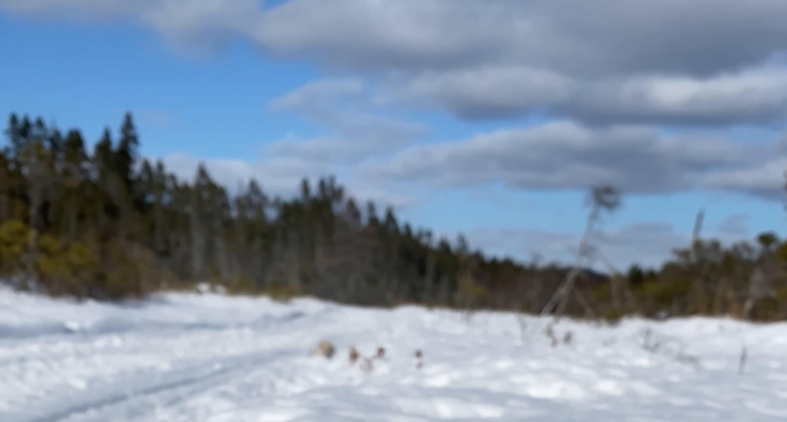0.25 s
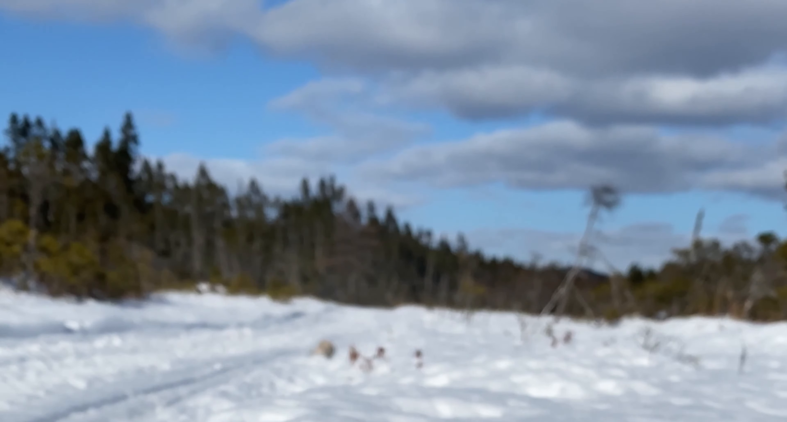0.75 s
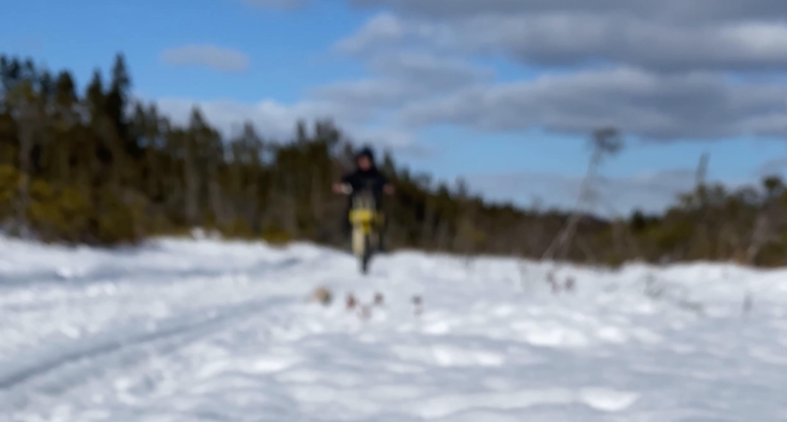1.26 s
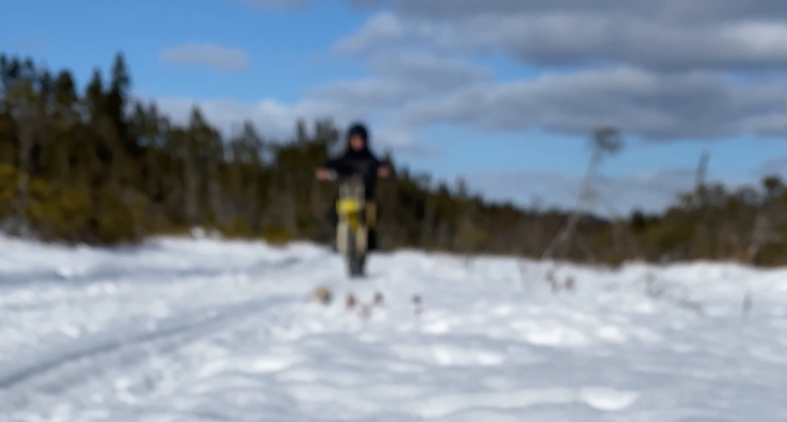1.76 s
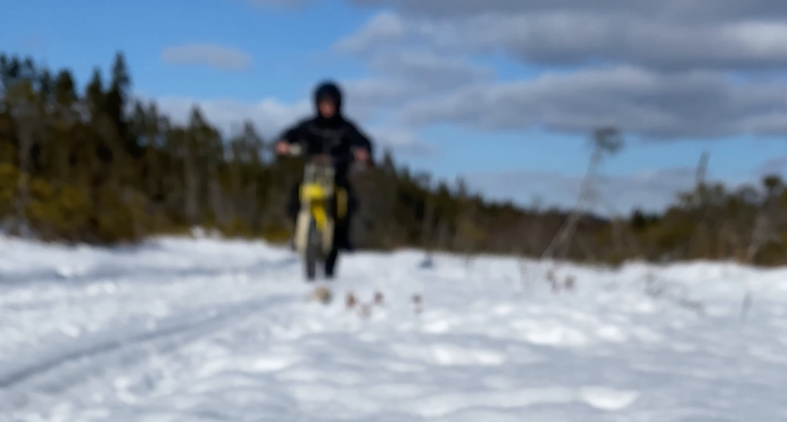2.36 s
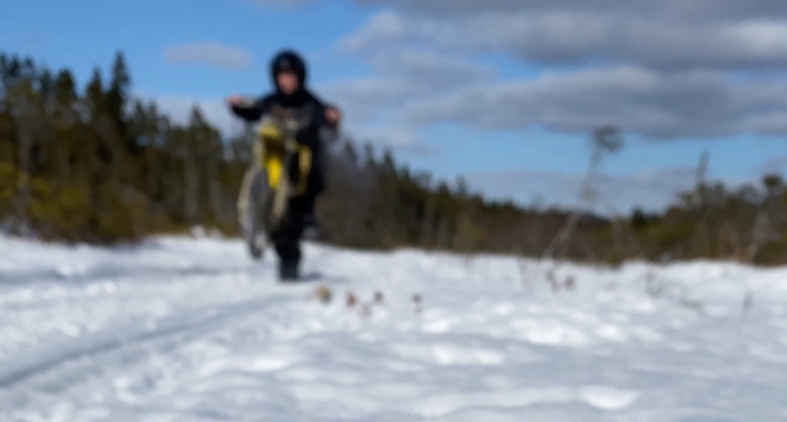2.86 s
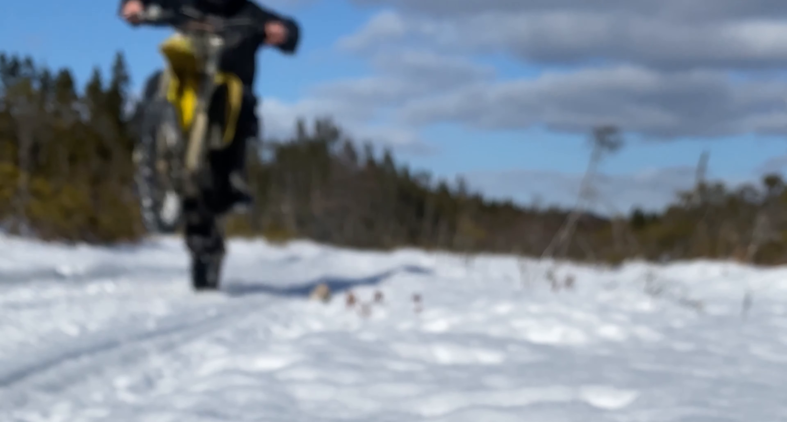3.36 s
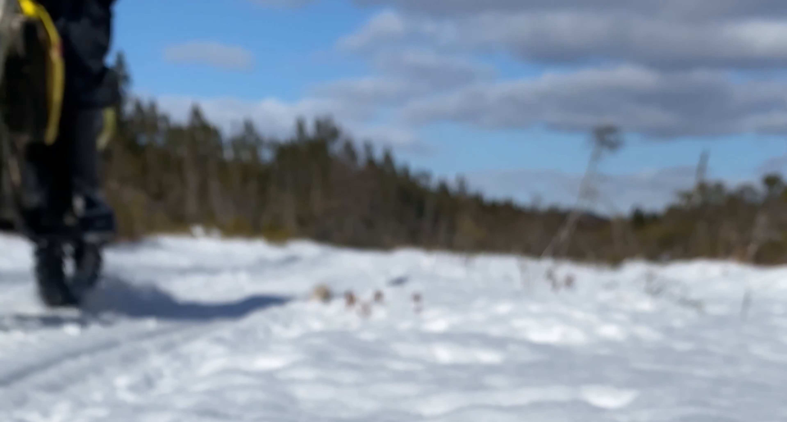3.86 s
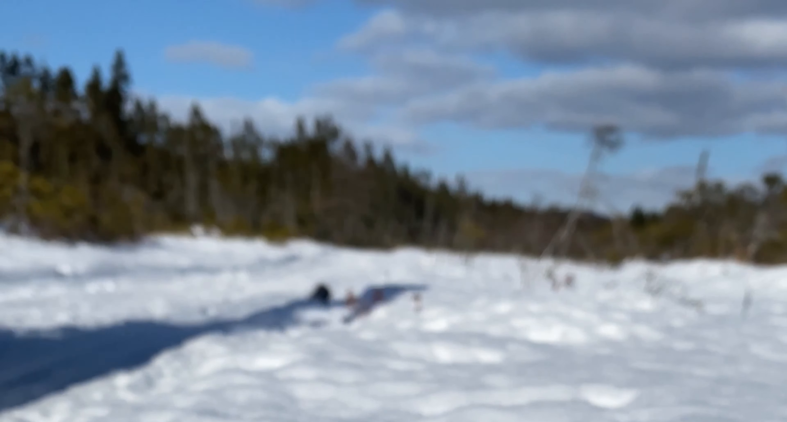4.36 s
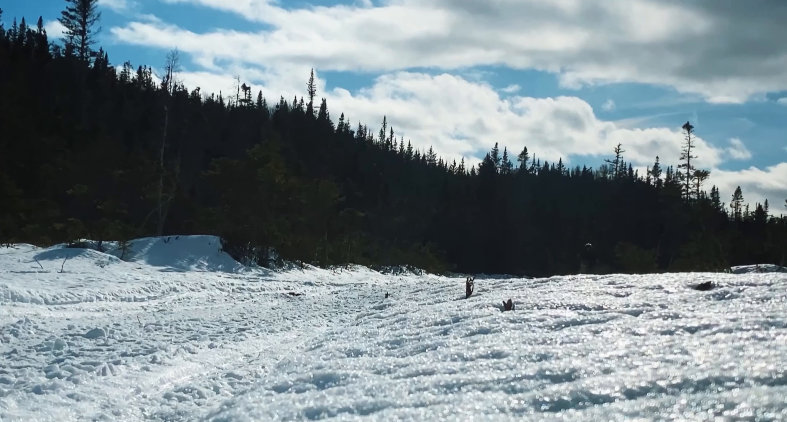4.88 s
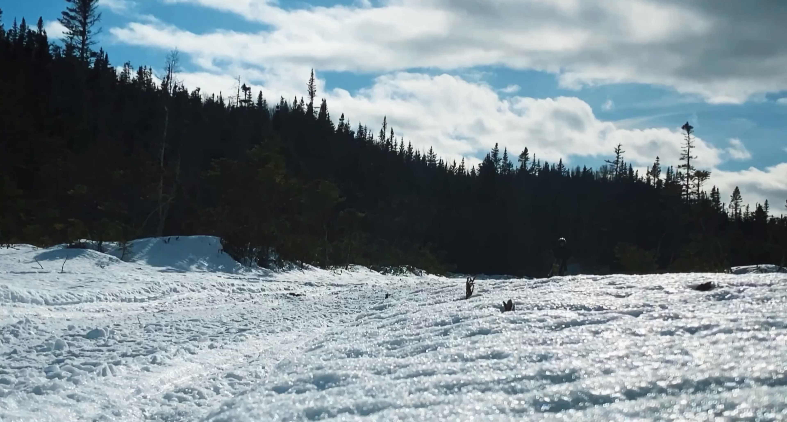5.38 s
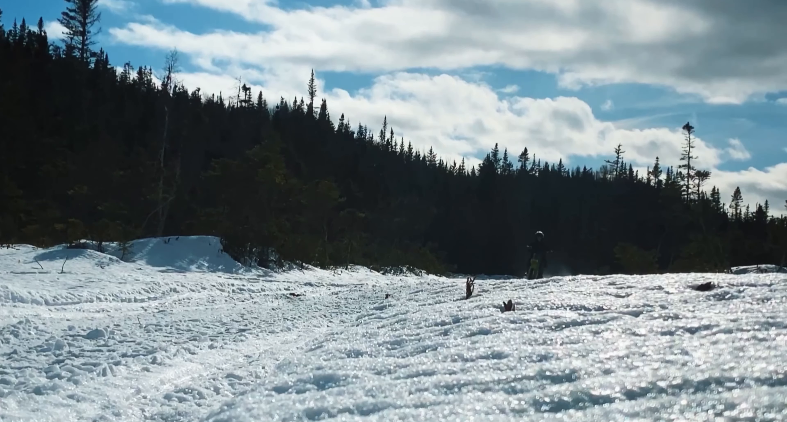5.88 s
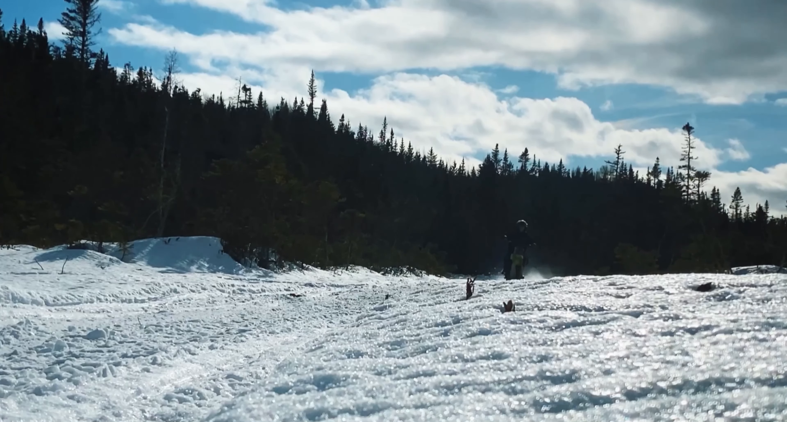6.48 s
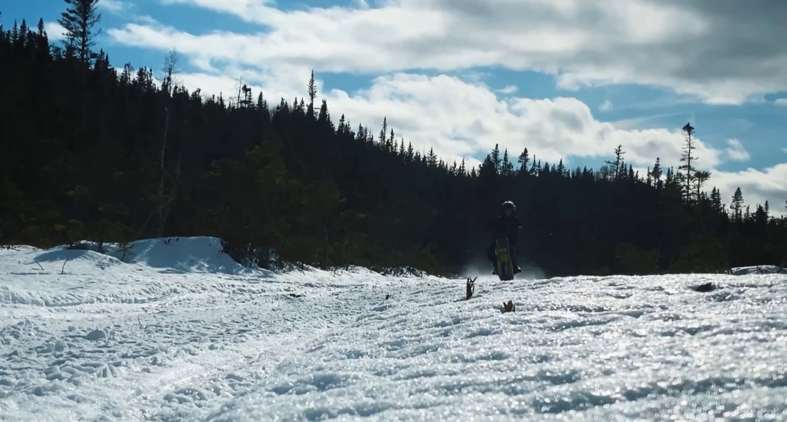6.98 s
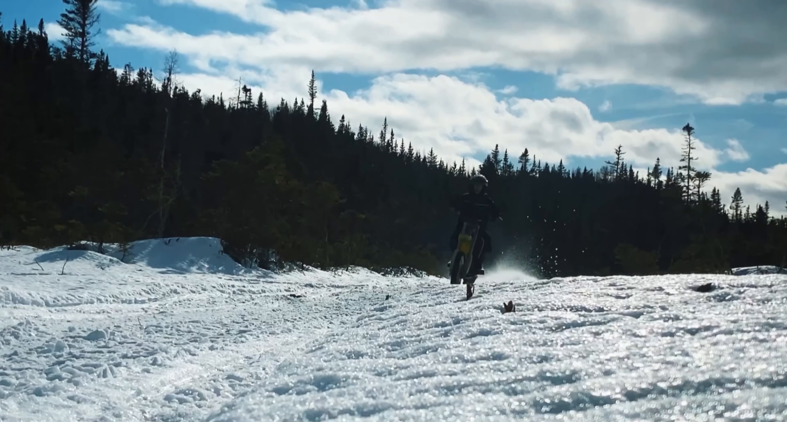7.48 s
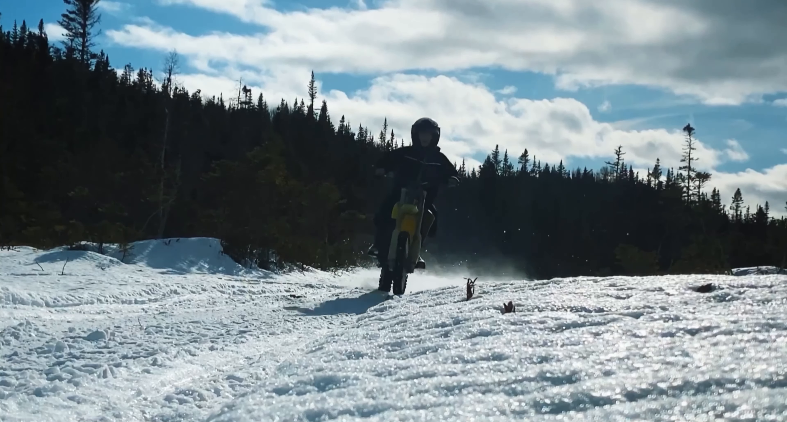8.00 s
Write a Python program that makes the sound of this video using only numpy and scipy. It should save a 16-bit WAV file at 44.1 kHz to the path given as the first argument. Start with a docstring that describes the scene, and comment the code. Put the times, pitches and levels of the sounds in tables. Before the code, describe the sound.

A small two-stroke dirt bike snarls away, then coasts in, bursts into a loud wheelie, burbles past over crunching snow, and charges in again from afar.

```python
"""A small two-stroke dirt bike on a snow field at a forest edge, in three scenes joined by cuts.
First it pulls away, tail pipe towards the listener; next it coasts in, lifts into a wheelie and burbles past
while tyres crunch, snow roars and the chain slaps; after a blink of silence it charges in from afar.
Each firing excites low orders, a pipe note, engine clatter and a rasp, all set by revs and throttle.
The trees scatter a soft tail throughout; a light wind rumbles, with low thumps, over faint still air."""
import sys
import numpy as np
from scipy import signal
from scipy.fft import rfft, irfft, next_fast_len
from scipy.io import wavfile
from scipy.ndimage import uniform_filter1d, map_coordinates

SR = 44100
rng = np.random.default_rng(int(sys.argv[2]) if len(sys.argv) > 2 else 0)


def unload_wav(signal):
    """Save mono or channel-first audio to the path in sys.argv[1] as 16-bit WAV at rate SR, clipped to [-1, 1]."""
    wavfile.write(
        sys.argv[1],
        SR,
        np.round(np.clip(np.atleast_2d(signal).T, -1, 1) * 32767).astype(np.int16),
    )


N = 363384
T = np.arange(N) / SR

# Throttle twists, and one swell of the second order just after the throttle shuts (at 0.664 s).
# Each row: start and end in seconds, relative intake boom in dB, its second order re that boom in dB,
# bite of the exhaust in dB.
PULLS = [(-.03, 0.127, -31.5, 1, -5), (0.184, 0.432, -21.5, -1, 7.5), (0.664, 0.82, -37, 26, -3),
         (2.413, 2.499, -12, 2, 11), (2.512, 2.574, -11.5, 0, 2.5), (2.58, 2.885, -13.5, 5, 12.5),
         (2.915, 3.121, -27, 21.5, 11.5), (4.366, 4.414, -28.5, -19, 12), (4.442, 4.805, -35.5, 10, 8),
         (4.877, 5, -31, -3, 11), (5.13, 5.653, -14.5, -7.5, 15), (5.779, 6.4, -14, -10.5, 12.5),
         (6.489, 6.577, -13.5, -24, 14.5), (6.666, 6.702, -17, -12, -3), (6.819, 6.88, -29.5, 10, 4),
         (6.893, 6.972, -12.5, 3, 3), (6.965, 7.401, -11, -10.5, 10), (7.466, 7.685, -11, -10.5, 10.5),
         (7.749, 7.926, -13.5, -9.5, 9.5), (7.977, 8.25, -11, -10.5, 9)]
# Overall loudness of the bike in the wheelie scene, leaping up as it lifts into the wheelie.
# Each row: time in seconds, level in dB.
WHEELIE_LOUDNESS = [(.638, -30), (.654, -12.5), (1, -20), (1.6, -17), (2.35, -12.5), (2.65, 2), (3.3, 0.5),
                    (3.75, -3), (3.95, 4.5), (4.15, 6), (4.31, 6.5)]
# How the wheelie meets the two microphone ports. Each row: frequency in Hz, left minus right in dB,
# phase lead of the left in radians.
WHEELIE_PORTS = [(100.0, 4.0, -0.03), (210.0, 10.0, 0.06), (350.0, 13.5, -1.05), (480.0, 6.8, -2.45),
                 (620.0, 0.5, -2.17), (820.0, -1.4, -2.16), (1250.0, -8.0, -2.95), (1800.0, -3.3, -5.62),
                 (2900.0, -3.0, -4.65), (3900.0, 0.7, -5.51), (5000.0, -0.1, -4.67), (7000.0, -0.4, -4.19),
                 (10000.0, 0.0, -3.14), (14000.0, 0.1, -2.05)]


def amp(db):
    """Level to gain: 20 dB is a factor of ten in pressure."""
    return 10 ** (np.asarray(db) / 20)


def decibels(gain):
    """Gain to level, the inverse logarithmic law."""
    return 20 * np.log10(np.maximum(gain, 1e-9))


def unit(x):
    """Normalise the mean power: scale to rms 1."""
    return x / np.sqrt(np.mean(x ** 2) + 1e-20)


def along(points, hz, axis=1):
    """Interpolate one column of a frequency table on a logarithmic axis."""
    table = np.transpose(points)
    return np.interp(np.log(hz + 1), np.log(table[0] + 1), table[axis])


def curves(rows, t):
    """Interpolate each column after the time linearly at the times t."""
    s, *cols = np.transpose(rows)
    return [np.interp(t, s, c) for c in cols]


def wobble(rate, t):
    """Band-limited random modulation: a smooth curve through rate Gaussian knots a second."""
    knots = rng.standard_normal(int(t[-1] * rate) + 4)
    return map_coordinates(knots, [t * rate], mode="nearest")


def filtered(x, response):
    """Linear filtering: the spectrum of x times a complex response of frequency."""
    n = x.shape[-1]
    m = next_fast_len(n + 8192)
    return irfft(rfft(x, m) * response(np.fft.rfftfreq(m, 1 / SR)), m)[..., :n]


def band(hz, lo, hi, order=8):
    """Butterworth-shaped band-pass gain with edges lo and hi."""
    below = 1 + (lo / (hz + 1)) ** (2 * order)
    above = 1 + (hz / hi) ** (2 * order)
    return 1 / np.sqrt(below * above)


def ports(mics, hz):
    """Stereo differences of level and phase, split evenly between two ports at constant total power."""
    half = amp(along(mics, hz) / 2) * np.exp(.5j * along(mics, hz, axis=2))
    return np.array([half, 1 / half]) / np.sqrt((abs(half) ** 2 + abs(half) ** -2) / 2)


def mix(tone, noise, share):
    """Power-preserving sum of uncorrelated signals; share is the noise's part of the power."""
    share = np.clip(share, 0, 1)
    return np.sqrt(1 - share) * tone + np.sqrt(share) * noise


def radiate(x, colour, mics, lo, hi, core):
    """Spectral colouring of one band at both ports, with rms 1 inside its core band."""
    pair = filtered(x, lambda hz: amp(along(colour, hz)) * band(hz, lo, hi) * ports(mics, hz))
    return pair / filtered(pair.mean(0), lambda hz: band(hz, *core)).std()


def engine(t, ride, pipe_colour, metal_colour, mics, boom_db, pipe_db, clatter_db, rasp_db,
           pipe_noise, clatter_noise, rasp_noise, gating, ring_t60, jitter, smear):
    """Periodic excitation, one firing per turn: low orders, pipe harmonics, ringing metal and gas noise."""
    # Level changes around a few firings. Each row: time and half length in seconds,
    # gain of boom and pipe in dB, gain of clatter and rasp in dB.
    bark_rows = [(.002, 0.011, 9, 16), (0.093, 0.0046, 5, 10.5), (0.107, 0.015, 9, 15),
                 (0.173, 0.0091, 5.5, 9), (0.406, 0.021, -4, 1.5), (0.539, 0.0022, 2, 15),
                 (0.556, 0.011, -2, 10.5), (1.738, 0.013, 9, 3), (1.82, 0.011, 14.5, 12),
                 (1.912, 0.01, 13.5, 10.5), (1.996, 0.012, 10, 7), (2.104, 0.026, 7.5, 2),
                 (2.408, 0.0051, 9.5, 6), (3.425, 0.012, 3.5, 2), (6.583, 0.0052, 3, 6.5),
                 (6.719, 0.012, -18, 10), (7.781, .02, 2.5, 1.5)]
    # Colour of the idling pipe. Each row: frequency in Hz, level in dB.
    burble_colour = [(120, 7), (210, 12.5), (300, 11.5), (390, 7), (480, 7), (640, 0.5), (850, -6),
                     (1400, -13), (2600, -25)]
    burble_db = -0.5  # re the bright note
    drift_per_s = 9  # how often the phases of the pipe's overtones wander

    hz, first, second, pipe, clatter, rasp = ride
    # near idle the cylinder scavenges badly and fires unevenly
    idle = np.clip((62 / hz) ** 3, 0, 1)
    turns = np.cumsum(hz * (1 + (jitter + .03 * idle ** 2) * wobble(70, t))) / SR
    phase = 2 * np.pi * turns
    luck = rng.standard_normal(int(turns[-1]) + 2)[np.round(turns).astype(int)]
    size = amp((.5 + .15 * idle) * luck)

    bark_low, bark_high = np.zeros(len(t)), np.zeros(len(t))
    for s, width, low_db, high_db in bark_rows:
        if t[0] < s < t[-1]:
            shape = np.exp(-((t - s) / width) ** 2)
            bark_low += shape * low_db
            bark_high += shape * high_db

    # gas rushes out while the exhaust port is open
    port_open = np.exp((gating + 0.018 * idle) * np.cos(phase - .6))

    def gas():
        return unit(size * port_open * rng.standard_normal(len(t)))

    flutter = amp((.35 + 1.2 * idle) * wobble(55, t) + boom_db + bark_low)
    orders = amp(first) * np.sin(phase) + amp(second) * np.sin(2 * phase)
    boom = -flutter * np.sqrt(2) * orders

    # the expansion chamber smears each pulse, differently as its hot gas churns
    overtones = sum(np.cos(k * phase + smear * wobble(drift_per_s, t)) for k in range(3, 28))
    # at higher revs fewer overtones fall in a band; the root of the revs makes up for it
    buzz = size * overtones * np.sqrt(hz)
    blow = filtered(gas(), lambda f: band(f, 99, SR, order=3))

    def exhaust(colour, share):
        tone, noise = (radiate(x, colour, mics, 100, 2600, (480, 1100)) for x in (buzz, blow))
        return mix(tone, noise, share)

    # on the pipe the note is bright; at idle it sinks to a dark burble
    bright = exhaust(pipe_colour, pipe_noise)
    note = mix(bright, amp(burble_db) * exhaust(burble_colour, .45), idle ** 2)

    scattered = mix(gas(), np.array([gas(), gas()]), .45)  # partly different at each port
    knock = mix(ringing(turns, size, ring_t60), scattered, clatter_noise + .4 * idle)
    knock = radiate(knock, metal_colour, mics, 1200, 3800, (1100, 3800))
    sizzle = mix(ringing(turns, size, ring_t60), gas(), rasp_noise + .4 * idle)
    sizzle = radiate(sizzle, metal_colour, mics, 3800, SR, (3800, 8000))
    shake = .5 * wobble(35, t)
    return (filtered(boom, lambda f: ports(mics, f))
            + amp(pipe + pipe_db + bark_low + shake) * note
            + amp(clatter + clatter_db + bark_high + shake) * knock
            + amp(rasp + rasp_db + bark_high + shake) * sizzle)


def ringing(turns, size, ring_t60):
    """Impulse response of thin metal: each firing's shock rattles on in many decaying modes."""
    modes_last_s = .13  # the moving bike keeps showing other modes
    at = np.interp(np.arange(1, int(turns[-1])), turns, np.arange(len(turns)))
    # windowed sinc places each shock between samples
    taps = at.astype(int)[:, None] + np.arange(-7, 9)
    lag = taps - at[:, None]
    shocks = np.sinc(lag) * np.sinc(lag / 8) * size[at.astype(int), None]
    train = np.bincount(np.clip(taps, 0, len(turns) - 1).ravel(), shocks.ravel(), len(turns))

    age, hop = np.arange(SR // 25) / SR, int(modes_last_s * SR)
    train = np.pad(train, (hop, 2 * hop))
    out = np.zeros(len(train) + len(age))
    fade = np.sin(np.pi * np.arange(2 * hop) / (2 * hop))
    for a in range(0, len(turns) + hop, hop):
        modes = rfft(rng.standard_normal(len(age)) * amp(-60 * age / ring_t60), 4 * len(age))
        # the modes share the energy evenly over wide bands
        metal = irfft(modes / np.sqrt(uniform_filter1d(abs(modes) ** 2, size=100)))[:len(age)]
        rattle = signal.fftconvolve(fade * train[a:a + 2 * hop], metal)
        out[a:a + len(rattle)] += rattle
    # more shocks a second carry more power; divide that out
    return unit(out[hop:hop + len(turns)] / np.sqrt(np.gradient(turns)))


def throttle(t, opens, closes):
    """Smooth step response of the engine between two times, 0 to 1."""
    open_s, close_s = 0.011, 0.028  # time constants
    return (1 + np.tanh((t - opens) / open_s)) / 2 * (1 + np.tanh((closes - t) / close_s)) / 2


def riding(t, revs, loudness, coast_db):
    """Order analysis: revs and throttle set the firing rate and the levels (dB) of each part of the engine."""
    # Resonance of the intake. Each row: frequency in Hz, gain in dB.
    airbox = [(80, -45), (110, -6.5), (140, -4), (190, 1), (225, -0.5), (280, -26.5), (430, -19.5)]
    # Exhaust with the throttle shut. Each row: firing rate in Hz, relative first and second order in dB.
    coasting = [(51.7, -58, -50), (70, -46.5, -41), (76, -42.5, -42), (86, -27, -42.5),
                (100.66, -30.5, -35.5), (106.5, -28, -35), (125, -44, -37), (130, -32.5, -31.5),
                (168, -31, -39.5), (212, -25, -46)]
    # Rows for pipe, clatter and rasp: level in dB with the throttle shut at the reference revs,
    # slope in dB per octave of revs, share of the bite.
    response = [(-44, 2, 0.57), (-35, 6.5, 0.46), (-40, 6, 1)]
    reference_hz = 210
    stutter_db, stutter_per_s = 2.5, 21  # with the throttle shut the engine catches unevenly

    hz, = curves(revs, t)
    loud_db, = curves(loudness, t)
    boom, overtone, bite = np.zeros(len(t)), np.zeros(len(t)), np.ones(len(t))
    for opens, closes, boom_db, second_db, bite_db in PULLS:
        if t[0] < (opens + closes) / 2 < t[-1]:
            swell = throttle(t, opens, closes)
            boom += swell * amp(boom_db)
            overtone += swell * amp(boom_db + second_db)
            bite += swell * (amp(bite_db) - 1)

    def coast(order):
        stutter = stutter_db * wobble(stutter_per_s, t)
        return amp(along(coasting, hz, axis=order) + coast_db + stutter)

    # an open intake booms on whichever order lies in the airbox resonance
    first = np.hypot(coast(1), boom * amp(along(airbox, hz)))
    second = np.hypot(coast(2), overtone * amp(along(airbox, 2 * hz)))
    octaves = np.log2(hz / reference_hz)
    upper = [shut_db + slope * octaves + share * decibels(bite) for shut_db, slope, share in response]
    return [hz] + [loud_db + level for level in (decibels(first), decibels(second), *upper)]


def honking(x, t):
    """Transient resonance: now and then one band stands out of the engine's sound or drops out of it."""
    # Each row: time and half length in seconds, centre in Hz, upper edge over centre
    # (below 1 the edges cross and weaken the band), nominal gain in dB.
    honks = [(.7, 0.091, 1750, 1.56, 7), (0.806, 0.061, 910, 1.07, 12), (.95, 0.065, 1200, 1, 7),
             (2.648, 0.052, 780, 1.18, 1.5), (2.699, 0.047, 3100, 1.14, 5), (2.8, 0.046, 5170, 0.7, 0),
             (3.02, 0.18, 960, 1.04, -15), (3.022, 0.085, 1380, 1.22, 5), (3.029, 0.065, 4160, 0.99, 6.5),
             (3.27, .063, 1050, 1, 9), (3.7, 0.2, 1403, 1.295, -6), (3.603, .054, 834, 1.2, 4.5),
             (3.783, .12, 2298, 1.03, 9.5), (3.84, .12, 340.2, 1.28, 4), (4.2, .14, 2600, 1.1, 7),
             (6.914, .075, 1210, 1.12, 12), (7.04, 0.099, 510, 1.15, 9), (7.4, .3, 841.5, 0.93, 4),
             (8.096, 0.32, 1331, 1.083, 3.5)]
    out = x
    for s, width, hz, spread, db in honks:
        if t[0] < s < t[-1]:
            resonance = filtered(x, lambda f: band(f, hz / spread, hz * spread, order=6))
            swell_db = db * np.exp(-((t - s) / width) ** 2)
            out = out + (amp(swell_db) - 1) * resonance
    return out


def knocks(t):
    """Damped oscillation: dull pops of the idling exhaust and short bright slaps of the chain."""
    # Pops in the pipe. Each row: start in seconds, relative level in dB, frequency in Hz.
    pops = [(3.808, -19, 282), (4.085, -11.5, 230), (4.133, -17.5, 249), (4.18, -19, 334)]
    # Chain slaps, on landing and rolling past. Each row: start in seconds, relative level in dB, ring in Hz.
    slaps = [(3.4032, -20.5, 1950), (3.9634, -29, 1846), (3.9935, -33, 1860), (4.0046, -26, 2445),
             (4.026, -21.5, 1960), (4.0827, -25, 2386), (4.1785, -25, 2563), (4.2354, -29, 2302),
             (4.2635, -25, 2218), (4.2908, -25, 2400)]
    pop_t60, pop_attack_s, pop_db = 0.024, 0.0017, 7.5
    slap_t60, slap_db, ring_db = .018, -6, 1.5  # ring re the noisy crack

    out = np.zeros(len(t))
    for s, db, hz in pops:
        age = np.maximum(t - s, 0)
        attack = 1 - np.exp(-age / pop_attack_s)
        out += amp(db + pop_db - 60 * age / pop_t60) * attack * np.sin(2 * np.pi * hz * age)
    for s, db, hz in slaps:
        age = np.maximum(t - s, 0)
        crack = unit(filtered(rng.standard_normal(len(t)), lambda f: band(f, 1550, 4500, order=2)))
        ring = amp(ring_db) * np.sin(2 * np.pi * hz * age)
        out += (t > s) * amp(db + slap_db - 60 * age / slap_t60) * (crack + ring)
    return filtered(out, lambda hz: ports(WHEELIE_PORTS, hz))


def roar(t):
    """Granular noise under a distance law: the rear wheel packs and throws snow, loudest as it passes."""
    # Colour of the churned snow. Each row: frequency in Hz, level in dB.
    snow_colour = [(90, -35), (200, -12), (300, -3), (480, 1.5), (650, -7), (1000, -9), (1500, -25),
                   (3000, -45)]
    roar_db, clumps_db = -29, 3.5
    pass_s, near_s = 4.28, 0.25  # the rear wheel is nearest; how long it stays near
    grains = rng.standard_normal(len(t)) * amp(clumps_db * wobble(250, t))
    churn = unit(filtered(grains, lambda hz: amp(along(snow_colour, hz)) * ports(WHEELIE_PORTS, hz)))
    near = 1 / (1 + ((t - pass_s) / near_s) ** 2)
    return amp(roar_db) * near ** 1.1 * churn


def tyres(t):
    """Granular fracture noise: knobs crush the snow crust in clumps of grains, following the bike's loudness."""
    crunch_db, clumps_db = -53, 4  # the crunch is re the bike's loudness
    loud_db, = curves(WHEELIE_LOUDNESS, t)
    grains = rng.standard_normal((2, len(t))) * amp(clumps_db * wobble(300, t))
    return amp(crunch_db + loud_db) * unit(filtered(grains, lambda hz: band(hz, 460.2, 1900, order=3)))


def shifting(x, depth_db):
    """Interference: reflections off uneven snow add and cancel, so resonances come and go as the bike moves."""
    hz, t, z = signal.stft(x, SR, nperseg=1024)
    field = uniform_filter1d(rng.standard_normal(z.shape[1:]), size=6, axis=0)
    field = unit(uniform_filter1d(field, size=10, axis=1))
    gain = amp(depth_db * band(hz, 900, SR, order=2)[:, None] * field)
    even = gain / np.sqrt(np.mean(gain ** 2, axis=1, keepdims=True))
    return signal.istft(z * even, nperseg=1024)[1][:, :x.shape[1]]


def absorbed(x, far_db, snow, air):
    """Absorption: with distance snow takes up the pipe note and air the top treble (shares of far_db)."""
    middle = filtered(x, lambda hz: band(hz, 470, 1100, order=4))
    top = filtered(x, lambda hz: band(hz, 7700, SR, order=4))
    return x + (amp(-snow * far_db) - 1) * middle + (amp(-air * far_db) - 1) * top


def forest(x, wet_db):
    """Diffuse reverberation: the trees turn part of the sound into a soft tail, different at each port."""
    # Decay among the trees. Each row: frequency in Hz, 60 dB decay time in seconds.
    decay = [(150, 0.19), (1000, 0.98), (4000, 1), (14000, 0.0073)]

    def scatter_band(f):
        return band(f, 400, 3000, order=2)

    hz, t, z = signal.stft(rng.standard_normal((2, SR // 2)), SR, nperseg=256)
    tail = signal.istft(z * amp(-60 * t / along(decay, hz)[:, None]), SR, nperseg=256)[1]
    tail = filtered(tail / np.linalg.norm(tail[0]), scatter_band)
    wet = amp(np.minimum(wet_db, -1))
    # scattered power is missing from the direct sound
    lost = (1 - np.sqrt(1 - wet ** 2)) * filtered(x, scatter_band)
    return x - lost + signal.fftconvolve(wet * x, tail, axes=1)[:, :x.shape[1]]


def leaving(t):
    """Port-gated radiation from behind: the tail pipe spits distinct pulses."""
    # Firing rate. Each row: time in seconds, firings in Hz.
    revs = [(0.0, 193.8), (0.06, 181.7), (0.132, 158), (0.17, 166.2), (0.251, 147.1), (0.336, 142.5),
            (0.43, 171.3), (0.46, 169), (0.53, 136.7), (0.63, 122.7)]
    # Overall loudness of the bike. Each row: time in seconds, level in dB.
    loudness = [(0, -8.5), (.42, -10.5), (.46, -19), (.55, -25.5), (.635, -34)]
    # Colour of the exhaust pipe. Each row: frequency in Hz, level in dB.
    pipe_colour = [(300, 16), (450, -3), (540, -8), (720, 11.5), (900, 8), (1150, 3), (1500, -0.5),
                   (2000, -4), (2600, 9)]
    # Colour of clatter and rasp. Each row: frequency in Hz, level in dB.
    metal_colour = [(1400.0, -11), (2000.0, -14), (2600.0, -3.5), (3300.0, -9), (4000.0, 0.5),
                    (4700.0, 6.5), (5500.0, -3), (6600.0, 0), (8500.0, -5.5), (11000.0, -10.5),
                    (15000.0, -26)]
    # Microphone ports. Each row: frequency in Hz, left minus right in dB, left lead in radians.
    mics = [(100.0, 3.7, 0.06), (210.0, 10.1, 0.21), (350.0, 13.7, -0.12), (480.0, 8.7, -1.13),
            (620.0, 11.4, -0.54), (820.0, 14.9, -2.03), (1250.0, 7.1, -2.22), (1800.0, 3.8, -1.76),
            (2900.0, -0.8, -1.31), (3900.0, -2.1, 0.2), (5000.0, -1.1, 0.83), (7000.0, -1.3, 1.06),
            (10000.0, 0.7, 3.3), (14000.0, 0.4, 3.99)]
    ride = riding(t, revs, loudness, coast_db=2)
    bike = engine(t, ride, pipe_colour, metal_colour, mics,
                  boom_db=-2.5, pipe_db=-2.0, clatter_db=-5.5, rasp_db=3.0,
                  pipe_noise=.05, clatter_noise=.25, rasp_noise=.4,
                  gating=.4, ring_t60=.022, jitter=.004, smear=.7)
    return forest(bike, wet_db=-19)


def wheelie(t):
    """Near-field pass, head on: coasting, a burst of throttle, then idling past."""
    # Firing rate. Each row: time in seconds, firings in Hz.
    revs = [(0.649, 171.4), (0.694, 148.1), (0.745, 133.5), (0.9, 120.4), (1.141, 106.9), (1.32, 107.5),
            (1.7, 98.7), (2.02, 103.1), (2.11, 95.84), (2.26, 83.9), (2.39, 80.17), (2.49, 112.6),
            (2.56, 115.8), (2.65, 156), (2.73, 189.3), (2.806, 210.1), (2.87, 216), (2.932, 197.7),
            (3.078, 192.2), (3.116, 181.5), (3.232, 147.1), (3.398, 116.3), (3.456, 110.6), (3.568, 96.5),
            (3.652, 84.87), (3.76, 68.22), (3.89, 54.14), (4.0, 50.98), (4.18, 66.38), (4.31, 77.5)]
    # Colour of the exhaust pipe. Each row: frequency in Hz, level in dB.
    pipe_colour = [(150, 11.5), (285, 15.5), (350, 5.5), (450, 4), (580, -5.5), (770, 6), (900, 4),
                   (1080, -0.5), (1300, -1), (1550, -6.5), (1800, -12), (2600, -13)]
    # Colour of clatter and rasp. Each row: frequency in Hz, level in dB.
    metal_colour = [(1400, -1), (1850, -2.5), (2450, 0), (3100, -1), (3750, -6), (4400, -3), (5200, -6),
                    (6000, -1.5), (7400, -1), (9800, -15), (12500, -4), (15000, -21)]
    ride = riding(t, revs, WHEELIE_LOUDNESS, coast_db=0.5)
    bike = engine(t, ride, pipe_colour, metal_colour, WHEELIE_PORTS,
                  boom_db=-0.5, pipe_db=-0.5, clatter_db=-4.0, rasp_db=-1.1,
                  pipe_noise=.015, clatter_noise=.3, rasp_noise=.36,
                  gating=.1, ring_t60=.036, jitter=.003, smear=1.2)
    bike = shifting(honking(bike, t), depth_db=2.3)
    return forest(bike + tyres(t) + roar(t) + knocks(t), wet_db=-14)


def charge(t):
    """Far-field approach, head on with short lifts: distance and a shut throttle blur the pipe's harmonics."""
    # Firing rate. Each row: time in seconds, firings in Hz.
    revs = [(4.369, 205), (4.46, 218.2), (4.81, 196.7), (4.88, 164), (4.991, 198.4), (5.17, 172.8),
            (5.18, 171.3), (5.27, 211.4), (5.471, 222.1), (5.75, 208.6), (5.79, 181.8), (5.85, 160.8),
            (5.98, 211.4), (6.05, 219.1), (6.12, 209), (6.34, 220.1), (6.37, 210.1), (6.44, 207.3),
            (6.47, 179.5), (6.56, 200.3), (6.67, 175.8), (6.73, 145.2), (6.8, 119.5), (6.86, 117.1),
            (6.929, 133.3), (7.01, 171.8), (7.06, 170.6), (7.2, 212.7), (7.38, 221.4), (7.44, 203.3),
            (7.669, 217.8), (7.75, 204.7), (7.861, 215.8), (7.94, 208.4), (8.04, 215.1), (8.1, 229.5),
            (8.171, 214.3), (8.24, 215.3)]
    # Overall loudness, mostly from distance. Each row: time in seconds, level in dB.
    loudness = [(4.365, -20.5), (4.391, -11.5), (5.1, -14.5), (5.7, -11.5), (6.5, -7.5), (6.9, -9.5),
                (7.35, -6), (7.62, -4), (7.82, -1), (8.24, 0)]
    # Share of the trees as the bike nears. Each row: time in seconds, level in dB.
    echo = [(4.4, -1), (6.6, -7.5), (7.3, -8.5), (8.2, -17)]
    # Colour of the exhaust pipe. Each row: frequency in Hz, level in dB.
    pipe_colour = [(150, 2), (290, -10), (360, -13), (430, -6), (500, -11.5), (570, -10), (640, -6),
                   (750, -3), (860, 1.5), (950, -2.5), (1060, -4), (1290, -3), (1550, -7.5), (2000, -9.5),
                   (2600, -11)]
    # Colour of clatter and rasp. Each row: frequency in Hz, level in dB.
    metal_colour = [(1300, -3), (1700, -5), (2100, -3), (2900, -.5), (3700, -2.5), (4300, -.5),
                    (4800, -2.5), (5300, 0), (6500, -1), (9000, -2), (12000, -1.5), (15000, -12)]
    # Microphone ports. Each row: frequency in Hz, left minus right in dB, left lead in radians.
    mics = [(100.0, 4.0, -0.23), (210.0, 7.7, -0.23), (350.0, 5.7, -0.87), (480.0, 3.9, -1.84),
            (620.0, -0.6, -1.41), (820.0, -0.2, -1.13), (1250.0, -2.1, -0.97), (1800.0, -2.4, -0.19),
            (2900.0, -7.5, 1.31), (3900.0, -2.2, 1.07), (5000.0, -1.8, 1.68), (7000.0, -0.9, 2.2),
            (10000.0, 0.0, 3.14), (14000.0, 0.1, 4.3)]
    far_blur, shut_blur = .36, .3  # noisy share of the pipe note
    loud_db, = curves(loudness, t)
    wet_db, = curves(echo, t)
    opened = sum(throttle(t, opens, closes) for opens, closes, *_ in PULLS)
    shut = 1 - np.minimum(opened, 1)
    blur = far_blur * amp(wet_db) ** 2 + shut_blur * shut + 0.02
    ride = riding(t, revs, loudness, coast_db=-8)
    bike = engine(t, ride, pipe_colour, metal_colour, mics,
                  boom_db=0.48, pipe_db=0.9 + 0.5 * shut, clatter_db=0.27, rasp_db=0.1,
                  pipe_noise=blur, clatter_noise=.45, rasp_noise=.45,
                  gating=.05, ring_t60=.037, jitter=.002, smear=1.2)
    bike = shifting(honking(bike, t), depth_db=2.3)
    bike = absorbed(bike, loud_db.mean() - loud_db, snow=.3, air=.8)
    return forest(bike, wet_db)


def wind_and_thumps():
    """Turbulent pressure makes a lumpy rumble; brief pressure pulses make low thumps, alike at both ports."""
    # Strength of the breeze. Each row: time in seconds, relative level in dB.
    breeze = [(0, -67), (.55, -83), (.66, -52), (.86, -50), (.92, -64), (1.15, -54), (1.42, -46.5),
              (1.6, -34.5), (2, -45.5), (3, -51.5), (3.3, -36.5), (3.8, -49), (4.28, -45), (4.4, -49.5),
              (5.5, -56.5), (6.05, -36), (6.3, -54), (6.56, -35), (6.63, -51), (6.71, -34.5), (6.78, -44),
              (7, -41), (7.12, -49), (7.25, -32.5), (8.24, -37.5)]
    # Low thumps: wind pushes, and short dull coughs of the intake at about 200 Hz.
    # Each row: centre in seconds, peak in dB, frequency in Hz.
    thumps = [(1.862, -30.5, 79.1), (4.608, -18.5, 122), (5.001, -35, 82), (5.65, -28, 69.9),
              (6.504, -32.5, 237), (6.666, -46, 210.9), (6.695, -27, 85), (6.722, -28, 80),
              (6.868, -34, 228), (7.239, -23, 74.6), (7.452, -16.5, 65.55), (7.731, -17.5, 69.85)]
    # Colour of the rumble. Each row: frequency in Hz, level in dB.
    buffet = [(15, -38), (30, -19), (55, -0.5), (85, -0.5), (130, -11), (200, -9.5), (400, -31),
              (1000, -101)]
    breeze_db, = curves(breeze, T)
    rumble = unit(filtered(rng.standard_normal(N), lambda hz: amp(along(buffet, hz))))
    out = rumble * amp(breeze_db + 0.5 + 2.1 * wobble(16, T))
    for s, db, hz in thumps:
        u = (T - s) * 2 * np.pi * hz
        # derivative of a Gaussian: one swing below and one above zero
        out += amp(db) * u * np.exp(np.maximum((1 - u * u) / 2, -40))
    return out


def still_air():
    """Stationary coloured noise, independent at each port: a faint steady background."""
    # Colour of the background. Each row: frequency in Hz, level in dB.
    air_colour = [(30, 15), (200, 5), (1000, -7), (8000, -7), (16000, -130)]
    return amp(-59.0) * unit(filtered(rng.standard_normal((2, N)), lambda hz: amp(along(air_colour, hz))))


def scene():
    """Superposition: three scenes over wind and still air, with a moment of silence at the second cut."""
    # Times in seconds: start, first cut, start of the silence, start of the charge.
    cuts = (0, .635, 4.315, 4.367)
    start, cut, gap, resume = (round(s * SR) for s in cuts)
    out = wind_and_thumps() + still_air()
    for part, a, b in ((leaving, start, cut), (wheelie, cut, gap), (charge, resume, N)):
        out[:, a:b] += part(T[a:b])
    live = np.ones(N)
    live[gap - 100:resume + 100] = 0
    return out * uniform_filter1d(live, size=200)


def record(dry):
    """Band limitation: the microphone channel keeps nothing above its top frequency."""
    top_hz = 15900
    return filtered(dry, lambda hz: hz < top_hz)


dry = scene()
out = record(dry)
unload_wav(out)
```